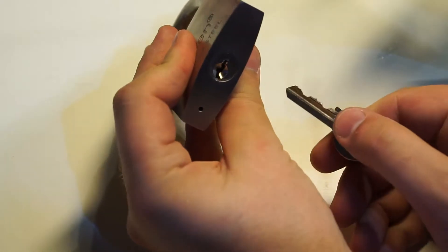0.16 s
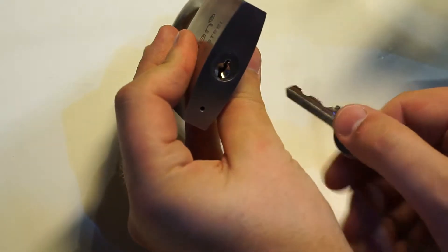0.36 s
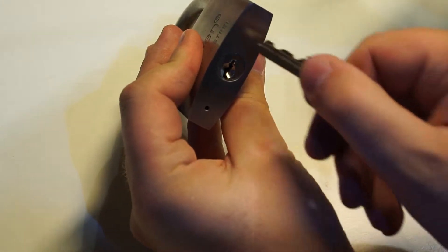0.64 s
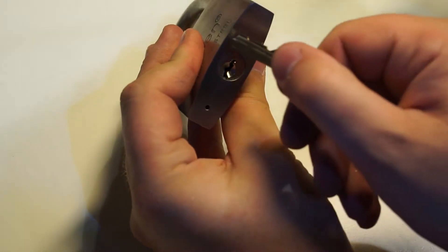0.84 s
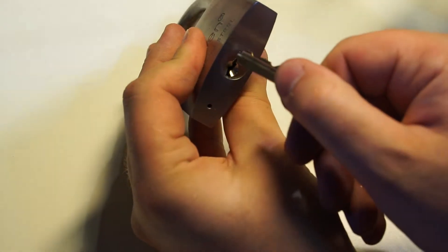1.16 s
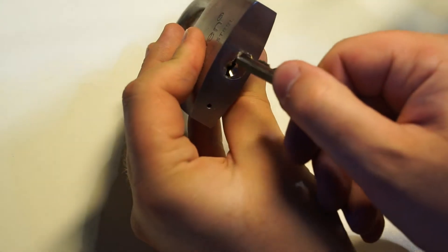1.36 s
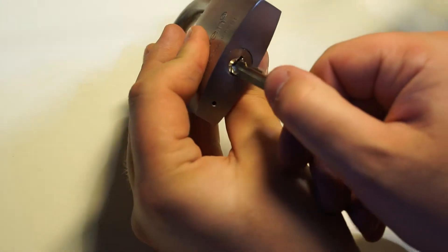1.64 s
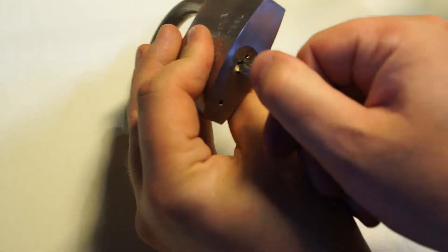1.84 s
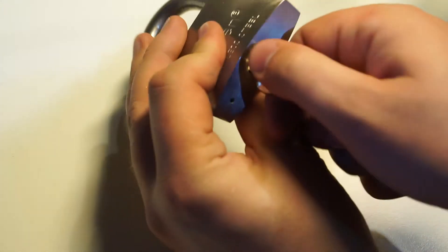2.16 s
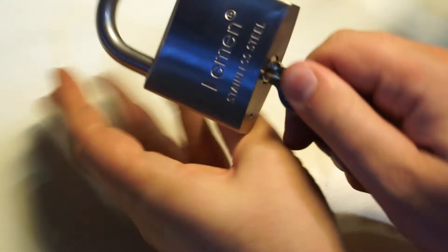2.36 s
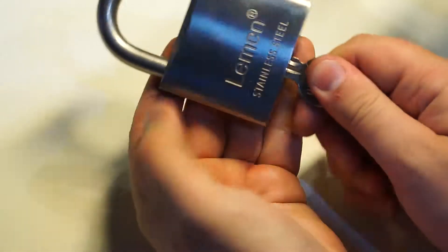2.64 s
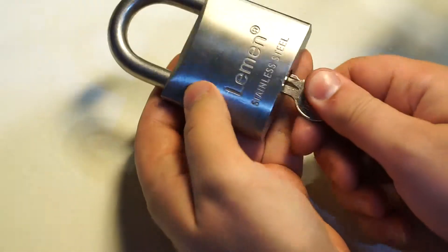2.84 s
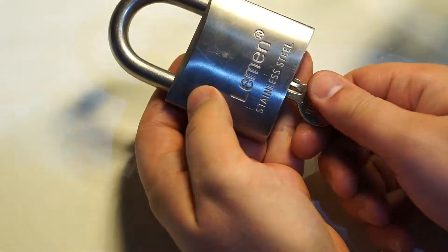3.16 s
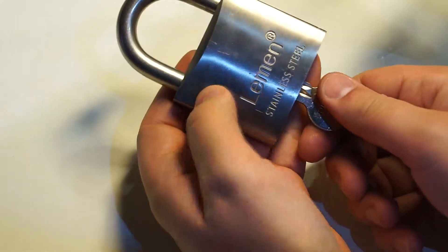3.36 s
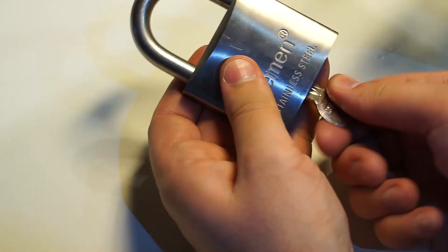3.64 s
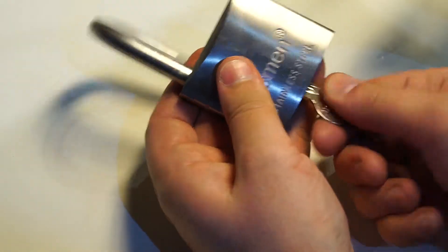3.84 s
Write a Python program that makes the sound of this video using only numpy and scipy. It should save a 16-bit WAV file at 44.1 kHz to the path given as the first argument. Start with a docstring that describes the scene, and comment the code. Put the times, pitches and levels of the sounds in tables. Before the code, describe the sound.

A key rasps into a padlock, then the shackle springs open with a sharp metallic clack.

```python
"""A hand-held steel padlock is unlocked in a small live room with a faintly whining fan.
A brief electronic whine comes first (1 s), then the key ticks at the keyway and rasps in over the pins
(1.5-2 s). The cylinder turns with one dry tick (2.3 s) and the hands shift their grip, skin on steel.
The shackle springs open, clacks against its stop and rings (3.8 s); a limiter ducks after the clack."""
import sys
import numpy as np
from scipy import signal
from scipy.fft import rfft, irfft
from scipy.io import wavfile
from scipy.ndimage import uniform_filter1d

SR = 44100
rng = np.random.default_rng(int(sys.argv[2]) if len(sys.argv) > 2 else 0)


def waveform_to_disk(signal):
    """Save audio, clipped to [-1, 1], as 16-bit WAV at the path in sys.argv[1]."""
    frames = np.transpose(np.atleast_2d(signal))
    scaled = np.clip(frames, -1, 1) * 32767
    samples = np.round(scaled).astype(np.int16)
    wavfile.write(sys.argv[1], SR, samples)


N = 176400
T = np.arange(N) / SR
CUTOFF_HZ = 15000
CONTACT_CORRELATION = 0.56   # left-right, for ticks and friction
LOCK_TAIL_DB, KEY_TAIL_DB = -9, -15   # relative to each contact's crack

# latch and shackle strike the body: (time [s], bright clack [dB], dull knock [dB])
LOCK_HITS = [(3.6222, -46, -67), (3.6371, -45, -52.5), (3.7558, -25, -41), (3.7599, -13.5, -28),
             (3.7612, -16, -29), (3.765, -2, -38), (3.765, -12, -21), (3.7675, 2, -19), (3.7701, 2.5, -22),
             (3.7708, 4, -10), (3.773, 2, -16.5), (3.7792, 0.5, -9), (3.781, 0.5, -20), (3.788, -20, -32),
             (3.803, -7, -36), (3.9361, -30, -38)]
# the shackle scrapes out: (start [s], length [s], bright level [dB], hollow level [dB])
SHACKLE_SLIDES = [(3.749, 0.0071, -38, -40), (3.76, 0.017, -19, -31.5)]
# the clack's steely top and the knock's midrange body: (frequency [Hz], gain [dB])
CLACK_EQ = [(1000, -38.5), (3200, -21.5), (4100, -12.5), (7200, -13.5), (7600, -4.5), (8900, -9),
            (11000, -5), (12300, -7.5), (13200, 2.5), (14300, -1), (15000, -5)]
KNOCK_EQ = [(300, -29), (750, -17), (1250, 1), (1900, -2.5), (3000, 0.5), (4200, 3.5), (4900, -3),
            (5500, 7), (6400, -3), (14000, -4.5)]
# the shackle's ring-out: (frequency [Hz], level [dB], T60 [s])
SHACKLE_MODES = [(4194, -22, .23), (5450, -24, .14), (7612, -20, .21), (7760, -25, .15), (7909, -25, .15),
                 (8495, -25, .16), (13095, -15, .15), (13510, -14, .15), (13660, -17, .14),
                 (13935, -17, .14)]
SHACKLE_STOP_S, SHACKLE_RING_DB = 3.7706, 1


def lock():
    """Latch and shackle hit the hand-damped body; the shackle scrapes out and rings at its stop."""
    times, clack_db, knock_db = np.transpose(LOCK_HITS)
    rasp, scrape = sliding(SHACKLE_SLIDES)
    clack = contacts(times, clack_db, stretch=2.6, decay_tail_db=LOCK_TAIL_DB) + rasp
    knock = contacts(times, knock_db, stretch=4.6, decay_tail_db=LOCK_TAIL_DB) + scrape
    ringing = ring(impulses([(SHACKLE_STOP_S, SHACKLE_RING_DB)]), SHACKLE_MODES)
    return equalise(clack, CLACK_EQ) + equalise(knock, KNOCK_EQ) + ringing


# the key finds the keyway, then rides the pins: (time [s], bright tick [dB], hollow body [dB])
KEY_CONTACTS = [(1.5285, -45.5, -48), (1.642, -49, -53.5), (1.658, -62, -54.5), (1.8288, -41.5, -46),
                (1.8722, -41.5, -50), (1.9425, -44, -48), (1.9494, -24, -63), (1.9632, -31, -55),
                (1.9679, -20.5, -45), (1.9756, -29, -45), (1.9815, -21, -38), (1.9895, -27, -39),
                (1.9966, -25, -36), (2.0025, -31, -33), (2.0099, -21, -40), (2.0134, -25, -29)]
# the blade slides in: (start [s], length [s], bright level [dB], hollow level [dB])
KEY_SLIDES = [(1.95, 0.042, -45, -47), (1.99, .027, -49, -43)]
# the key's sparkle and the keyway's hollow mids: (frequency [Hz], gain [dB])
KEY_EQ = [(1000, -38), (3500, -29), (6800, -25), (8500, -7.5), (10000, -6.5), (11300, 1), (13000, -2),
          (15000, -3.5)]
KEYWAY_EQ = [(300, -25), (900, -13), (1700, -8), (2700, -2.5), (3800, 2.5), (5300, -0.5), (7000, -1),
             (14000, -19)]
# the key's thin steel shimmer: (frequency [Hz], level [dB], T60 [s])
KEY_MODES = [(10877, -24, .12), (11230, -20, .13), (11980, -24, .1), (12770, -22, .1)]


def key():
    """The key ticks and scrapes over the pins; the keyway sounds hollower as it goes deeper."""
    times, tick_db, hollow_db = np.transpose(KEY_CONTACTS)
    rasp, scrape = sliding(KEY_SLIDES)
    bright = contacts(times, tick_db, stretch=1.6, decay_tail_db=KEY_TAIL_DB) + rasp
    hollow = contacts(times, hollow_db, stretch=3.7, decay_tail_db=KEY_TAIL_DB) + scrape
    return equalise(bright, KEY_EQ) + ring(bright, KEY_MODES) + equalise(hollow, KEYWAY_EQ)


# the cylinder's crisp tick: (frequency [Hz], gain [dB])
CYLINDER_EQ = [(2400, -22), (3500, -7.5), (7000, -8.5), (7800, 1.5), (11000, -2), (13300, 2)]
TURN_S, TURN_DB = 2.3466, -28.5


def cylinder():
    """The cylinder turns home with one dry tick, damped by the hand around the lock."""
    tick = contacts([TURN_S], [TURN_DB], stretch=2.2, decay_tail_db=KEY_TAIL_DB)
    return equalise(tick, CYLINDER_EQ)


def contacts(times, levels_db, stretch, decay_tail_db):
    """Metal taps metal: a crack, its fall stretched for heavier parts, and a short tail that dies away within
    about 10 ms."""
    rise_s, crack_s, decay_tail_s = 0.00059, 0.00036, 0.01
    t, track = T[:SR // 20], np.zeros((2, N + SR))
    width_s = crack_s * np.where(t > rise_s, stretch, 1)
    crack = np.exp(-((t - rise_s) / width_s) ** 2)
    decay_tail = from_db(decay_tail_db) * np.exp(-t / decay_tail_s)
    for time, db in zip(times, levels_db):
        start = int(time * SR)
        burst = (crack + decay_tail) * stereo_noise(CONTACT_CORRELATION, len(t))
        track[:, start:start + len(t)] += from_db(db) * unit_energy(burst)
    return track[:, :N] * np.sqrt(.002 * SR)   # levels are rms over 2 ms


def sliding(strokes):
    """Metal slides on metal: gated strokes of friction, as a bright and a hollow layer."""
    grains, bright, hollow = friction(), 0, 0
    for start, length, bright_db, hollow_db in strokes:
        stroke = grains * ((T > start) & (T < start + length))
        bright += from_db(bright_db) * stroke
        hollow += from_db(hollow_db) * stroke
    return bright, hollow


def friction(slips_per_s=3800, spread_db=2):
    """Surfaces catch and let go in dense tiny slips of uneven size; rms 1."""
    sizes = from_db(spread_db * np.minimum(rng.exponential(1, N), 4))
    slips = rng.random(N) < slips_per_s / SR
    return unit_rms(slips * sizes * stereo_noise(CONTACT_CORRELATION, N))


def impulses(hits):
    """Clean one-sample blows that set a body ringing."""
    track = np.zeros(N)
    for time, db in hits:
        track[int(time * SR)] = from_db(db) * np.sqrt(.002 * SR)   # levels are rms over 2 ms
    return track


def ring(strike, modes):
    """A struck body rings as decaying sines; each mode's level sets its energy."""
    t, response = T[:SR // 2], 0
    for hz, db, t60 in modes:
        partial = np.sin(2 * np.pi * hz * t) * from_db(-60 * t / t60)
        response += from_db(db) * unit_energy(partial)
    return convolve(strike, response)


# a key tap (two rows at one instant), then a handling thump: (time [s], level [dB])
TAP_AND_THUMP = [(1.6585, -53), (1.6585, -54), (3.4161, -37.5)]
# their short, boxy body: (frequency [Hz], level [dB], T60 [s])
BOXY_MODES = [(350, 3.5, 0.063), (580, -15.5, 0.026), (1170, -9.5, 0.019), (3346, -18.5, .004)]


def tap_and_thump():
    """A light, boxy tap of the key (1.66 s), then one soft handling thump (3.4 s)."""
    return ring(impulses(TAP_AND_THUMP), BOXY_MODES)


# fader ride for skin on steel: (time [s], level [dB])
SKIN_FADER = [(0, -101), (2.1, -68), (2.48, -65), (2.54, -53.5), (2.6, -55.5), (2.68, -54.5), (2.77, -69),
              (3.5, -79), (3.6, -71), (3.65, -62), (3.73, -55.5), (4, -59)]
# the skin's airy hiss: (frequency [Hz], gain [dB])
SKIN_EQ = [(600, -11.5), (3000, -7), (6500, -7), (7800, -7), (9000, -6), (13000, 0), (15000, -4.5)]


def hands():
    """Skin rubs over the steel as the hands shift their grip."""
    return equalise(fader(SKIN_FADER) * friction(), SKIN_EQ)


# fader ride for the shifting grip: (time [s], level [dB])
GRIP_FADER = [(0, -67.5), (2.1, -74), (2.48, -50.5), (2.55, -60), (2.62, -54.5), (2.85, -61.5),
              (3.3, -62.5), (3.7, -60), (4, -74)]
# the grip's muffled low mids and the bump's bass weight: (frequency [Hz], gain [dB])
GRIP_EQ = [(60, -18.5), (130, 2), (260, -6), (345, -0.5), (450, -5.5), (800, -22), (3000, -26.5),
           (12000, -30)]
BUMP_EQ = [(20, -10), (45, 3.5), (140, -1), (300, -10.5), (800, -25.5), (5000, -74)]
BUMP_S, BUMP_WIDTH_S, BUMP_DB = 2.55, 0.021, -41


def handling_rumble():
    """The grip rustles dully, with one low bump as the lock is turned over."""
    rustle = fader(GRIP_FADER) * equalise(stereo_noise(0.53, N), GRIP_EQ)
    bump_envelope = from_db(BUMP_DB) * np.exp(-.5 * ((T - BUMP_S) / BUMP_WIDTH_S) ** 2)
    return rustle + bump_envelope * equalise(stereo_noise(1.0, N), BUMP_EQ)


# a needle-thin electronic whine: (frequency [Hz], level [dB])
WHINE_PARTIALS = [(10266, -75), (10912, -75), (11547, -74)]


def electronic_whine(start_s=1.04, end_s=1.145):
    """A brief, faint, high electronic whine of steady pitch."""
    progress = np.clip((T - start_s) / (end_s - start_s), 0, 1)
    swell = np.sqrt(2 * np.abs(np.sin(np.pi * progress)))
    return swell * sum(from_db(db) * np.sin(2 * np.pi * hz * T) for hz, db in WHINE_PARTIALS)


# the small room's decay: (frequency [Hz], T60 [s])
ROOM_DECAY = [(500, 0.23), (4000, 0.32), (9000, 0.27), (15000, 0.21)]


def room_reverb(sound, wet_db=-3, build_s=0.00078):
    """Wall reflections blur into a diffuse tail that lasts longest around 4 kHz."""
    t, centres = T[:SR // 2], np.geomspace(250, 16000, 7)
    hz = np.fft.rfftfreq(len(t), 1 / SR)
    spectrum, tail = rfft(stereo_noise(0.056, len(t))), 0
    for centre, weights in zip(centres, np.eye(len(centres))):
        octave = irfft(spectrum * at_hz(np.c_[centres, weights], hz), len(t))
        tail += octave * from_db(-60 * t / at_hz(ROOM_DECAY, centre))
    fade_in = 1 - np.exp(-t / build_s)
    return from_db(wet_db) * convolve(sound, unit_energy(tail * fade_in))


# fan drone, whine and a thin high hiss: (centre [Hz], half-width [Hz], level before the fader [dB])
FAN_BANDS = [(85.3, 24, -57), (1071, 85, -65), (2196, 57.5, -63.5), (12750, 180, -75.5)]
# slow fader ride on the fan: (time [s], gain [dB])
FAN_FADER = [(0, 2.5), (1.0, 1.5), (1.8, -1), (2.6, -2.5), (3.7, -1)]
# the bass-heavy bed of room air: (frequency [Hz], gain [dB])
AIR_EQ = [(20, -15), (50, -8), (90, 1), (135, -12), (220, -15), (450, -19.5), (900, -22.5), (1700, -26),
          (3000, -31), (6000, -34), (14000, -35)]
# stereo image, centred lows and wide mids: (frequency [Hz], left-right correlation [-1 to 1])
AIR_CORRELATION = [(50, 0.98), (100, 1), (200, 0.54), (450, -0.38), (1000, -0.38), (2500, -0.17)]
AIR_DB, FAN_MIN_CORRELATION = -50.5, 0.073


def room_tone():
    """The fan whines in wavering narrow noise bands over the air's low rumble and hiss."""
    hz, fan_response = np.fft.rfftfreq(N, 1 / SR), 0
    correlation = at_hz(AIR_CORRELATION, hz)
    for centre, half_width, db in FAN_BANDS:
        fan_response += from_db(db) * unit_rms(1 / (1 + ((hz - centre) / half_width) ** 2))
    fan_noise = stereo_noise(np.maximum(correlation, FAN_MIN_CORRELATION), N)
    fan = fader(FAN_FADER) * irfft(rfft(fan_noise) * fan_response)
    air = from_db(AIR_DB) * equalise(stereo_noise(correlation, N), AIR_EQ)
    return fan + air


def from_db(db):
    """Decibels to gain."""
    return 10 ** (np.asarray(db) / 20)


def unit_rms(x):
    """Scale to rms 1."""
    return x / np.sqrt(np.mean(x ** 2) + 1e-20)


def unit_energy(x):
    """Scale each channel to energy 1."""
    return x / np.sqrt(np.sum(x ** 2, axis=-1, keepdims=True) + 1e-20)


def at_hz(curve, hz):
    """Read a curve on a log-frequency axis."""
    frequencies, values = np.transpose(curve)
    return np.interp(np.log(np.maximum(hz, 1)), np.log(frequencies), values)


def fader(points):
    """Gain automation through (time [s], level [dB]) points."""
    return from_db(np.interp(T, *np.transpose(points)))


def stereo_noise(correlation, size):
    """White noise with a given left-right correlation, one value or one per frequency."""
    correlation = np.clip(correlation, -.999, .999)
    noise = rng.standard_normal((2, size))
    shares = np.sqrt(np.vstack([1 + correlation, 1 - correlation]) / 2)
    mid, side = irfft(rfft(noise) * shares, size) if np.ndim(correlation) else noise * shares
    return np.array([mid + side, mid - side])


def equalise(sound, curve, size=4096):
    """Minimum-phase EQ, normalised so that the curve sets the tone and not the level."""
    hz = np.fft.rfftfreq(size, 1 / SR)
    gain = from_db(at_hz(curve, hz))
    gain /= np.sqrt(np.mean(gain ** 2 * (hz < CUTOFF_HZ)))
    cepstrum = irfft(np.log(gain))
    cepstrum[1:size // 2] *= 2   # folded forward, so nothing rings ahead of an attack
    cepstrum[size // 2 + 1:] = 0
    return convolve(sound, irfft(np.exp(rfft(cepstrum))))


def convolve(sound, response):
    """Pass a sound through an impulse response."""
    sound, response = (np.atleast_2d(x).astype("float32") for x in (sound, response))
    return signal.oaconvolve(sound, response, axes=-1)[:, :N]


def scene():
    """Key, lock and hands up close, with their reverb, over handling rumble and room tone."""
    close = key() + cylinder() + lock() + tap_and_thump() + hands() + electronic_whine()
    return close + room_reverb(close) + handling_rumble() + room_tone()


def release(db, db_per_s):
    """Catch each peak and let it sink at a steady rate."""
    return np.maximum.accumulate(db + db_per_s * T) - db_per_s * T


def record(dry):
    """A limiter ducks the peaks and recovers quickly at first, then slowly; the top end is cut."""
    threshold_db, slow_share = -19.5, 0.47
    high_cut = signal.cheby2(20, 60, CUTOFF_HZ + 330, fs=SR, output="sos")
    sidechain = signal.sosfilt(high_cut, dry)
    power = uniform_filter1d(np.mean(sidechain ** 2, axis=0), size=66)   # 1.5 ms window
    over_db = np.maximum(10 * np.log10(np.abs(power) + 1e-12) - threshold_db, 0)
    fast_db = release(over_db, db_per_s=275)
    slow_db = release(slow_share * over_db, db_per_s=29)
    duck_db = uniform_filter1d(np.maximum(fast_db, slow_db), size=22)   # 0.5 ms smoothing
    return signal.sosfilt(high_cut, dry * from_db(-duck_db))


dry = scene()
out = record(dry)
waveform_to_disk(out)
```